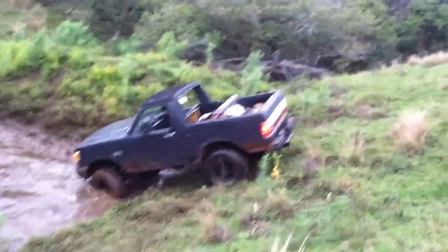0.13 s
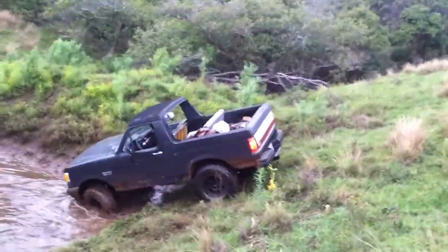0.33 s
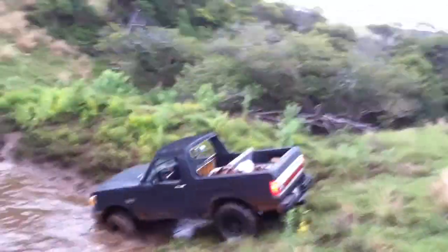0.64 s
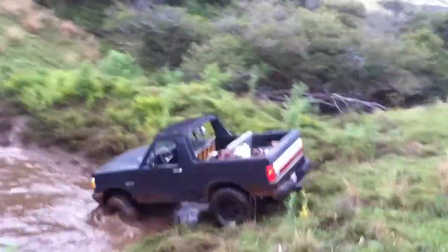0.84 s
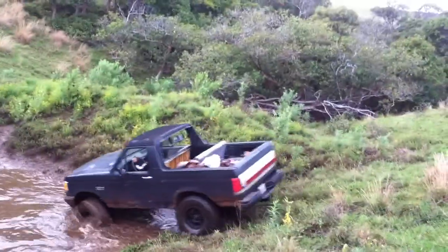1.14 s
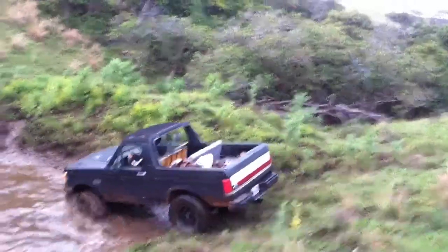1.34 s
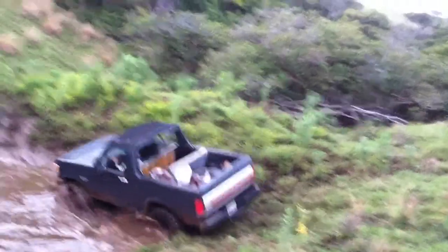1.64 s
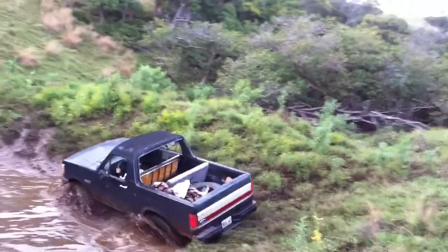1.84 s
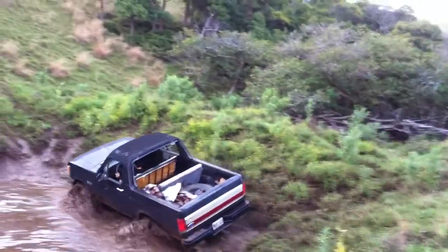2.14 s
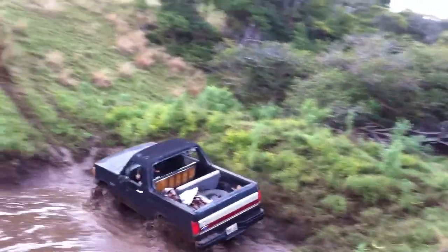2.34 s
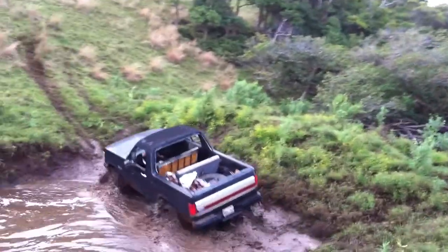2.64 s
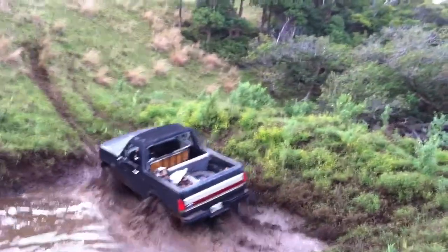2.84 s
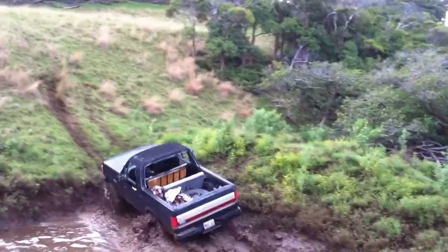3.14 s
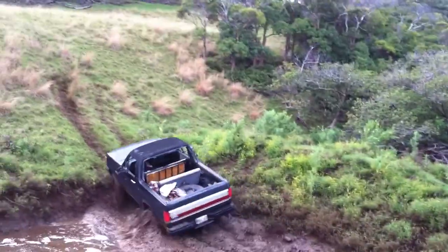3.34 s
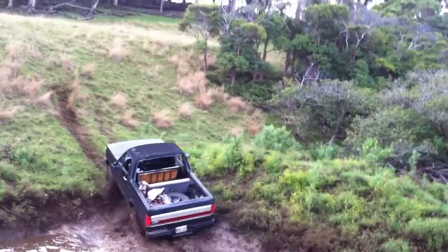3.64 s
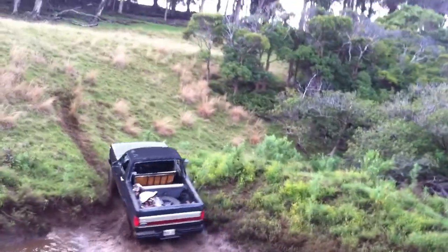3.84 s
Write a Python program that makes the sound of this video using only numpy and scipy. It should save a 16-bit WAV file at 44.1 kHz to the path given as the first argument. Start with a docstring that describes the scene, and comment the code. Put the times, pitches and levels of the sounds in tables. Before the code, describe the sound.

An off-road truck's engine burbles at idle, then revs up into a loud, booming drone that holds. Beneath it, the tires churn and splash through a muddy pool outdoors, with a light hiss of spray.

```python
"""On a bank above a muddy pool, a V8 off-road truck creeps down at idle, brakes moaning, then drives through.
Uneven firing pulses excite the resonances of the muffler and tailpipe as a burble; as the throttle opens,
the periodic tone at the firing rate takes over as a booming drone, over a rasp of gas and machinery.
Spray and churned mud hiss as many random impacts, with short bursts of spray, and bubbles ring."""
import sys
import numpy as np
from scipy import signal
from scipy.fft import rfft, irfft
from scipy.io import wavfile
from scipy.ndimage import uniform_filter1d

SR = 44100
rng = np.random.default_rng(int(sys.argv[2]) if len(sys.argv) > 2 else 0)


def wav_out(sig):
    """Save sig, one row per channel (or a flat mono array), as 16-bit PCM at SR to the path in sys.argv[1]."""
    wavfile.write(sys.argv[1], SR, np.round(np.clip(np.atleast_2d(sig).T, -1, 1) * 32767).astype(np.int16))


N = 176400
T = np.arange(N) / SR

# Spectrum of the still air. Each row: frequency in Hz, relative gain in dB.
AIR_SPECTRUM = [(25, 17.5), (60, 22.5), (200, 3), (1000, 8), (4000, 7.5), (9000, -2), (13000, -9),
                (16000, -15.5)]
# Two brake moans near 612 Hz and a short, low engine hum at 155 Hz.
# Each row: start in seconds, length in seconds, pitch in Hz, level at the crest in dB.
MOANS_AND_HUM = [(-.2, .45, 612, -60.5), (.1, .3, 616, -71), (.244, .17, 155, -41)]
# Spectra of churned mud and of spray. Each row: frequency in Hz, relative gain in dB.
CHURN_SPECTRUM = [(400, -10.5), (560, -6), (700, 4.5), (850, -1.5), (1000, -0.5), (1170, 5), (1330, -0.5),
                  (1500, -7), (1700, 1), (1880, -4.5), (2050, -8.5), (2300, -4.5), (2650, -12.5),
                  (3500, -23.5), (6000, -44.5)]
SPRAY_SPECTRUM = [(1800, -26), (2800, -4.5), (3250, 2.5), (3650, 1.5), (4000, 0.5), (4600, 0), (5100, 0.5),
                  (5600, 1.5), (6250, 4.5), (6650, -1.5), (7100, -10.5), (8000, -18), (10000, -41.5),
                  (15000, -40)]
# Their envelopes. Each row: time in seconds, level in dB before the trim.
CHURN_LEVEL = [(0, -66), (.4, -69), (.82, -69), (1.05, -60.5), (1.55, -59.5), (1.8, -60), (1.92, -57),
               (2.4, -61), (2.92, -64), (3.35, -62.5), (3.65, -61.5), (3.82, -56), (4, -55.5)]
SPRAY_LEVEL = [(0, -74.5), (.65, -77.5), (.88, -71.5), (1.05, -66.5), (1.501, -66), (1.8, -64), (1.92, -61),
               (2.15, -61), (2.35, -64), (2.849, -68.5), (3.051, -68), (3.55, -65), (3.89, -57), (4, -58.5)]
# Bubble families. Each row: centre frequency in Hz, relative level in dB.
BUBBLE_FAMILIES = [(670, -4), (1250, -1), (1860, -3), (3400, -3)]
# Short hissing bursts of spray, many in time with the engine cycle.
# Each row: start in seconds, level in dB before the envelope, centre frequency in Hz.
SPRAY_BURSTS = [(0.906, -62.5, 4860), (0.958, -59.5, 3230), (1.012, -63, 5930), (1.065, -62.5, 3220),
                (1.066, -59, 1930), (1.104, -68, 6240), (1.16, -75, 1830), (1.2, -70, 5860),
                (1.24, -65, 3300), (1.275, -62, 5730), (1.346, -65, 1900), (1.356, -66, 6200),
                (1.39, -61.5, 3600), (1.428, -67, 1980), (1.44, -65, 5760), (1.489, -67, 2650),
                (1.52, -61, 5800), (1.599, -61.5, 5500), (1.675, -71, 5760), (1.786, -60, 1900),
                (1.858, -59, 4440), (1.925, -60, 4150), (2.1, -58.5, 4016), (2.954, -66.5, 5794)]
# Engine speed. Each row: time in seconds, firings per second.
FIRING_RATE = [(0.0, 68.22), (0.15, 67.54), (0.3, 65.59), (0.45, 65.21), (0.65, 64.23), (0.82, 65.31),
               (0.95, 75.89), (1.08, 87.36), (1.25, 95.88), (1.45, 99.13), (1.65, 102.81), (1.8, 110.35),
               (1.9, 125.86), (2.0, 143.21), (2.1, 151.16), (2.25, 154.23), (2.4, 160.65), (2.55, 168.72),
               (2.78, 164.7), (3.0, 160.32), (3.2, 153.05), (3.5, 148.79), (3.75, 163.0), (4.0, 177.45)]
# Cylinders in firing order. Each row: relative strength in dB, lateness at the tailpipe in seconds.
CYLINDER_PULSES = [(3.1, 0.0008), (1.3, -0.0006), (-1.3, 0.0017), (1.2, 0.001), (-8.4, -0.0015),
                   (1.8, 0.0006), (0.9, 0.0003), (1.4, 0.0004)]
# Spectra of the rasp and of the exhaust's response to a firing. Each row: frequency in Hz, relative dB.
RASP_SPECTRUM = [(40, -21.5), (100, -14), (250, 3.5), (380, -4), (470, -1), (570, 1), (720, -1), (850, -8),
                 (1000, -18.5), (1500, -39.5), (3000, -51)]
MUFFLER_RESPONSE = [(25, -58.5), (40, -44.5), (65, -27), (100, -12), (130, -3.5), (155, 5), (175, 4.5),
                    (200, 2.5), (220, -6), (245, -6.5), (275, -8), (305, -7.5), (335, -15.5), (370, -31),
                    (480, -41.5), (900, -71.5)]
# Envelope of the rasp. Each row: time in seconds, level in dB before the trim.
RASP_LEVEL = [(0, -61.5), (.55, -68), (1, -63), (1.4, -61), (1.8, -55), (2.05, -50.5), (2.5, -55),
              (2.85, -56.5), (3.1, -54), (3.3, -56.5), (3.6, -51.5), (3.85, -49), (4, -55.5)]
# Tailpipe resonances rung by the pulses. Each row: frequency in Hz, bandwidth in Hz, relative gain in dB.
TAILPIPE_MODES = [(188.6, 78, 9.5), (216, 39, -8)]
# Pipe resonances that lift a passing overtone. Each row: frequency in Hz, half-width in Hz, lift in dB.
PIPE_RESONANCES = [(351, 29, 9), (559, 28, 7.5)]
# Envelopes of the pulses, tailpipe ringing, boom and growl. Each row: time in seconds, level in dB.
PULSE_LEVEL = [(0, -43.5), (.45, -45), (.88, -45), (1.02, -43), (1.25, -38), (1.7, -39), (2.1, -48),
               (2.35, -45.5), (3.4, -51), (4, -51)]
RINGING_LEVEL = [(0, -76), (.9, -69.5), (1.0, -50.5), (1.12, -37.5), (1.3, -65), (1.7, -47), (1.95, -37.5),
                 (2.13, -43.5), (2.35, -50.5), (4, -44)]
BOOM_LEVEL = [(0, -60), (.8, -61), (1.15, -45), (1.7, -42.5), (1.85, -35), (2.06, -25.5), (2.3, -27),
              (2.55, -26.5), (2.77, -27), (2.93, -32), (3.07, -26.5), (3.27, -30.5), (3.5, -29.5),
              (3.78, -25.5), (4, -28)]
GROWL_LEVEL = [(0, -96), (1.7, -87), (2.2, -70.5), (2.6, -62), (2.85, -63), (3.06, -60.5), (3.25, -63),
               (3.55, -60), (3.72, -59), (3.88, -55), (4, -53.5)]
# Overtones of boom, bark and growl. Each row: multiple of the cycle rate, dB relative to the envelope.
BOOM_OVERTONES = [(5, -20), (6, -30), (7, -32), (9, -30), (10, -20), (11, -34.5), (12, -29), (13, -42),
                  (14, -40.5), (15, -33)]
BARK_OVERTONES = [(10, 4.5), (11, -1), (12, -7), (14, -15.5)]
GROWL_OVERTONES = [(19, 1.5), (21, -2.5), (23, -5), (24, -6), (25, -1.5), (26, -1.5), (27, -7), (28, -4),
                   (29, -5), (30, -5), (32, -9), (33, -13.5), (34, -4), (35, -11.5)]

FIRINGS_PER_CYCLE = len(CYLINDER_PULSES)


def amp(db):
    """Amplitude grows tenfold for every 20 dB."""
    return 10 ** (np.asarray(db) / 20)


def unit(x):
    """Normalisation to an rms of 1."""
    return x / np.sqrt(np.mean(x ** 2) + 1e-20)


def curve(rows):
    """Linear interpolation between (seconds, value) rows."""
    return np.interp(T, *np.transpose(rows))


def colour(x, spectrum):
    """Minimum-phase filtering imposes a (Hz, dB) shape causally; the result has rms 1."""
    points_hz, points_db = np.transpose(spectrum)
    hz = abs(np.fft.fftfreq(16384, 1 / SR))
    log_gain = np.log(amp(np.interp(np.log(hz + 1), np.log(points_hz), points_db)))
    taps = np.fft.ifft(np.exp(signal.hilbert(log_gain).conj())).real[:4096]
    return unit(signal.oaconvolve(x, taps)[:N])


def wander(rate_hz):
    """Low-passed noise gives random motion up to about the given rate, with rms 1."""
    hz = np.fft.rfftfreq(N, 1 / SR)
    return unit(irfft(rfft(rng.standard_normal(N)) * np.exp(-(hz / rate_hz) ** 2), N))


def steady(x):
    """Division by the running rms evens out slow changes of level."""
    power = uniform_filter1d(uniform_filter1d(x ** 2, size=8000), size=8000)
    return x / np.sqrt(power + 1e-20)


def add(mix, start_s, sound):
    """Superposition: a sound sums into the mix from its start time."""
    part = mix[max(round(start_s * SR), 0):][:len(sound)]
    part += sound[:len(part)]


def resonate(x, hz, bandwidth_hz):
    """A damped resonator, with a gain of about 1 at its natural frequency."""
    pole = np.exp((-np.pi * bandwidth_hz + 2j * np.pi * hz) / SR)
    return 2 * signal.lfilter([1 - abs(pole)], [1, -pole], x).real


def still_air(level_db=-73.5):
    """Stationary broadband noise forms a faint background."""
    return amp(level_db) * colour(rng.standard_normal(N), AIR_SPECTRUM)


def moans_and_hum():
    """Modulated tones: two moans of dragging brakes and a low engine hum waver, swell and fade."""
    out = np.zeros(N)
    for start_s, length_s, hz, db in MOANS_AND_HUM:
        swell = np.sin(np.pi * np.clip((T - start_s) / length_s, 0, 1))
        pitch_hz = hz * (1 + 0.014 * wander(rate_hz=15))
        out += amp(db) * swell * np.sin(2 * np.pi * np.cumsum(pitch_hz) / SR)
    return np.sqrt(2) * out


def reflections(x, count=8, gain=0.07, span_s=0.02):
    """Early reflection: the truck's body and the bank add weak, delayed copies of a sound."""
    out = x.copy()
    for delay, polarity in rng.random((count, 2)):
        add(out, delay * span_s, gain * np.sign(polarity - 0.5) * x)
    return out / np.sqrt(1 + count * gain ** 2)


def bubbles(sizes=30, family_births_per_s=420, pitch_spread=0.044, decay_cycles=9.6, trim_db=-5.5):
    """Bubble resonance: each size pings at its own rising pitch; the level follows the churned mud."""
    out, t = np.zeros(N), np.arange(SR // 20) / SR
    for centre_hz, db in BUBBLE_FAMILIES:
        for hz in centre_hz * (1 + pitch_spread * rng.standard_normal(sizes)):
            rising_tone = np.sin(2 * np.pi * hz * t * (1 + 0.95 * t))
            ping = rising_tone * np.exp(-t * hz / decay_cycles) * np.minimum(t * hz / 2, 1)
            births = (rng.random(N) < family_births_per_s / sizes / SR) * rng.random(N)
            out += amp(db) * signal.oaconvolve(births, ping)[:N]
    return unit(out) * amp(curve(CHURN_LEVEL) + trim_db)


def water(spectrum, level, drops_per_s, drop_share, clump_db, trim_db):
    """Shot noise: drops strike at random over a wash of finer ones, and both swell in clumps."""
    impacts = (rng.random(N) < drops_per_s / SR) * rng.choice([-1, 1], N)
    drops = impacts * amp(1.5 * np.minimum(rng.exponential(1, N), 4))
    wash = rng.standard_normal(N)
    clumps = amp(clump_db * wander(rate_hz=49))
    return colour((drop_share * unit(drops) + wash) * clumps, spectrum) * amp(curve(level) + trim_db)


def spray_bursts(rise_s=0.003, decay_s=0.025, width_octaves=0.26):
    """Transient band noise: each burst of spray hisses around its own pitch and decays exponentially."""
    out, t = np.zeros(N), np.arange(SR // 5) / SR
    hz = np.fft.rfftfreq(len(t), 1 / SR)
    envelope = np.minimum(t / rise_s, 1) * np.exp(-t / decay_s)
    low_pass = 1 / (1 + (hz / 6900) ** 20)
    for start_s, db, centre_hz in SPRAY_BURSTS:
        band = np.exp(-(np.log2((hz + 1) / centre_hz) / width_octaves) ** 2 / 2)
        burst = unit(irfft(rfft(rng.standard_normal(len(t))) * band * low_pass, len(t)))
        add(out, start_s, amp(db) * burst * envelope)
    return out


def rasp(firings, trim_db=0.5):
    """Amplitude modulation: gas and machinery noise puffs with each firing and each engine cycle."""
    firing_puffs = 1 + 0.25 * np.cos(2 * np.pi * firings)
    cycle_swell = 1 + 0.12 * np.cos(2 * np.pi * firings / FIRINGS_PER_CYCLE)
    noise = firing_puffs * cycle_swell * rng.standard_normal(N)
    return colour(noise, RASP_SPECTRUM) * amp(curve(RASP_LEVEL) + trim_db)


def burble(firings, jitter_s=0.00045, spread_db=1.8):
    """Impulse excitation: pulses, uneven between cylinders, thump the muffler and ring the tailpipe."""
    fired_at = np.flatnonzero(np.diff(np.floor(firings))) + 1
    cylinder = firings[fired_at].astype(int) % FIRINGS_PER_CYCLE
    strength_db, late_s = np.array(CYLINDER_PULSES)[cylinder].T
    timing_scatter, strength_scatter = rng.standard_normal((len(fired_at), 2)).T
    arrivals = np.clip(fired_at + (late_s + jitter_s * timing_scatter) * SR, 0, N - 1).astype(int)
    pulses = np.bincount(arrivals, amp(strength_db + spread_db * strength_scatter), N)
    thumps = colour(pulses, MUFFLER_RESPONSE)
    ringing = sum(amp(db) * resonate(thumps, hz, width) for hz, width, db in TAILPIPE_MODES)
    # the amplitude dips to half once in each engine cycle
    lope = 1 - 0.5 * np.cos(np.pi * (firings / FIRINGS_PER_CYCLE - 0.57)) ** 8
    loping_thumps = steady(thumps * lope) * amp(curve(PULSE_LEVEL))
    return loping_thumps + steady(ringing * lope) * amp(curve(RINGING_LEVEL))


def overtones(firings, table, flutter, smear_turns=0, smear_hz=550):
    """Forced resonance: harmonics of the engine cycle swell as they pass a pipe's natural frequency."""
    cycles = firings / FIRINGS_PER_CYCLE
    cycle_hz = curve(FIRING_RATE) / FIRINGS_PER_CYCLE
    out = np.zeros(N)
    for multiple, db in table:
        pitch_hz = multiple * cycle_hz
        lift_db = sum(peak * np.exp(-((pitch_hz - hz) / width) ** 2) for hz, width, peak in PIPE_RESONANCES)
        slip = smear_turns * (pitch_hz / smear_hz) ** 2 * wander(rate_hz=16)  # roughens the high ones
        gain = amp(db + lift_db) * (1 + flutter * wander(rate_hz=6.4))
        out += gain * np.sin(2 * np.pi * (multiple * cycles + rng.random() + slip))
    return out


def drone(firings, bark_s=2.17, bark_half_width_s=0.19, bark_db=-41.5):
    """Periodic excitation: the exhaust booms under load, barks at the throttle snap, growls on the climb."""
    firing_tone = np.sin(2 * np.pi * firings) * (1 + 0.055 * wander(rate_hz=90))
    boom = (firing_tone + overtones(firings, BOOM_OVERTONES, flutter=0.11)) * amp(curve(BOOM_LEVEL))
    snap = np.exp(-((T - bark_s) / bark_half_width_s) ** 2)
    bark = overtones(firings, BARK_OVERTONES, flutter=0.22) * amp(bark_db) * snap
    growl = overtones(firings, GROWL_OVERTONES, flutter=0.25, smear_turns=0.1) * amp(curve(GROWL_LEVEL))
    return np.sqrt(2) * (boom + bark + growl)


def scene():
    """Superposition of air, brakes, water and engine in one channel."""
    firings = 0.73 + np.cumsum(curve(FIRING_RATE)) / SR  # phase: one turn per firing
    engine = burble(firings) + drone(firings) + rasp(firings)
    churn = water(CHURN_SPECTRUM, CHURN_LEVEL, drops_per_s=1500, drop_share=0.5,
                  clump_db=1.2, trim_db=-1.02)
    spray = water(SPRAY_SPECTRUM, SPRAY_LEVEL, drops_per_s=3100, drop_share=0.37,
                  clump_db=1.33, trim_db=-1.0)
    background = still_air() + moans_and_hum()
    return (background + reflections(churn + spray + spray_bursts() + bubbles()) + engine)[None]


def record(dry):
    """Band limiting: a low-pass filter removes the treble above 15.7 kHz."""
    low_pass = signal.firwin(511, 15700, window=("kaiser", 9), fs=SR)
    return signal.oaconvolve(dry, low_pass[None], "same")


dry = scene()
out = record(dry)
wav_out(out)
```